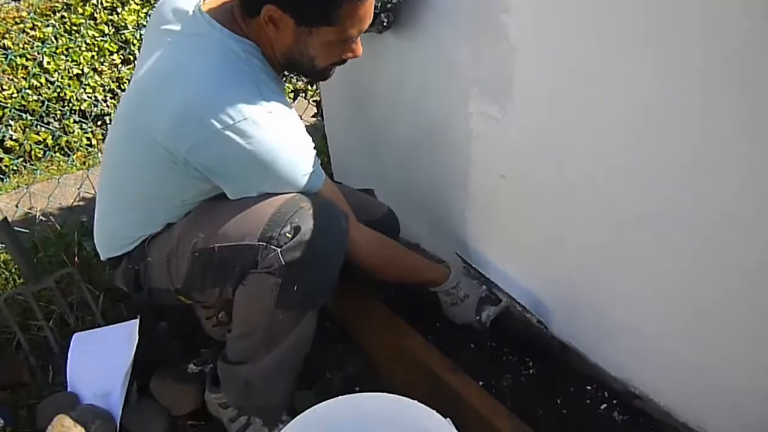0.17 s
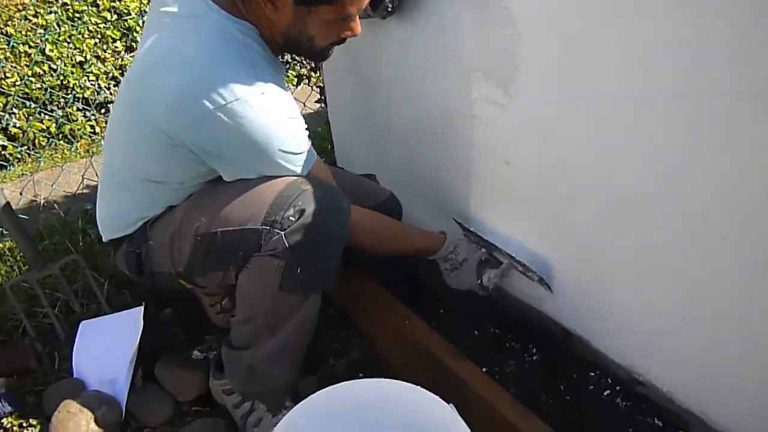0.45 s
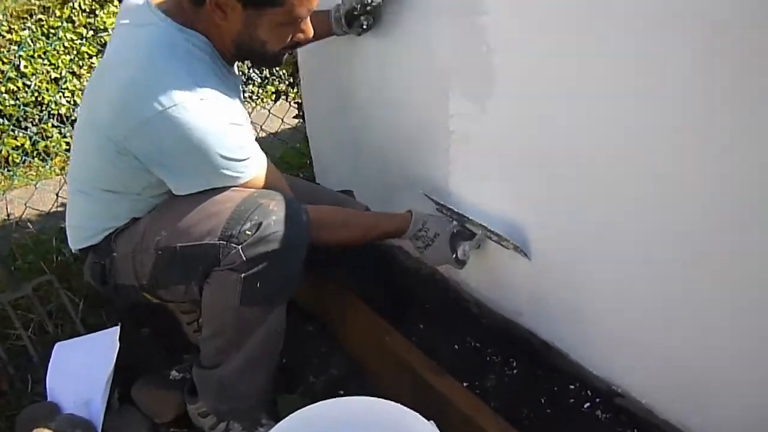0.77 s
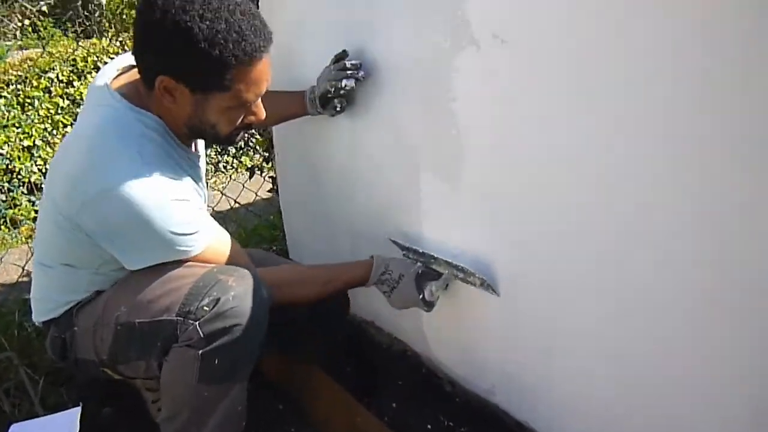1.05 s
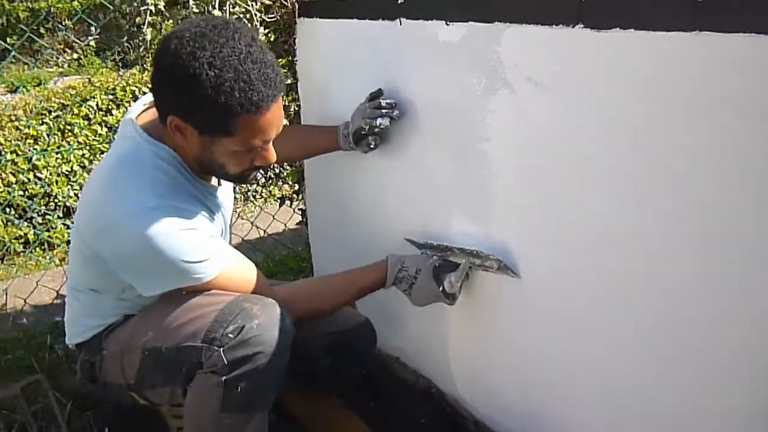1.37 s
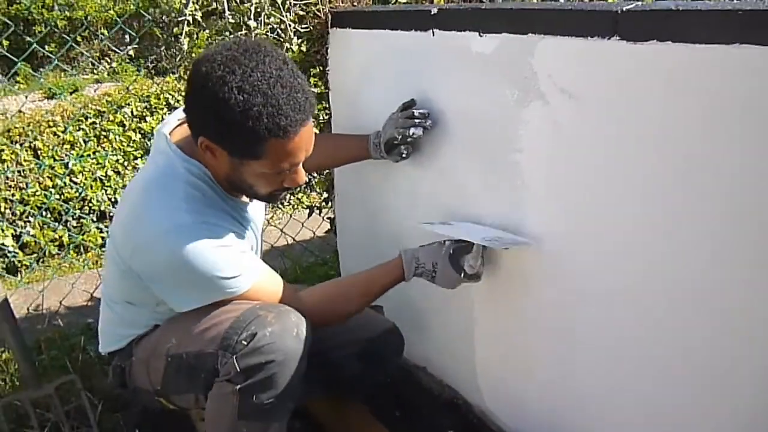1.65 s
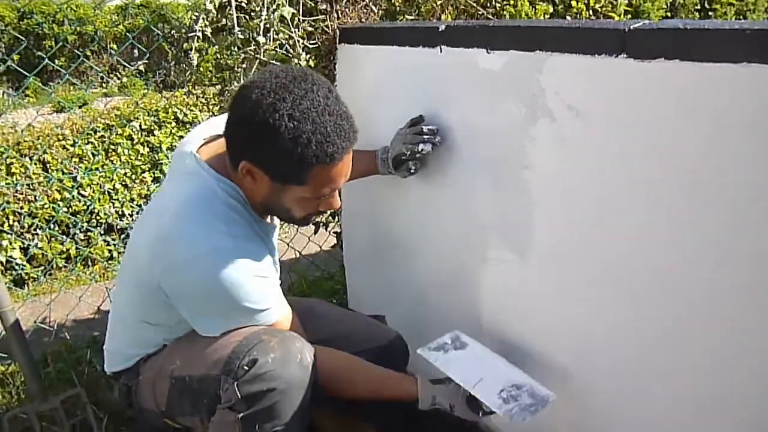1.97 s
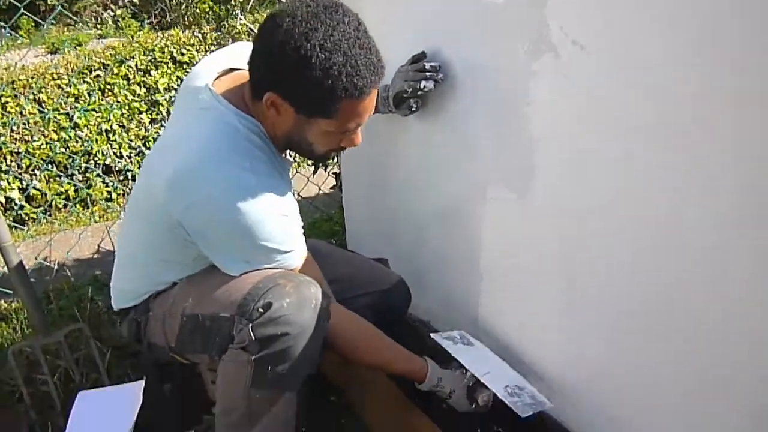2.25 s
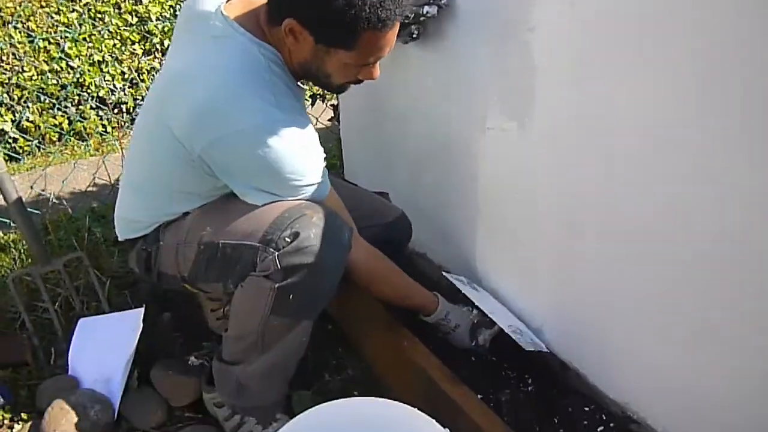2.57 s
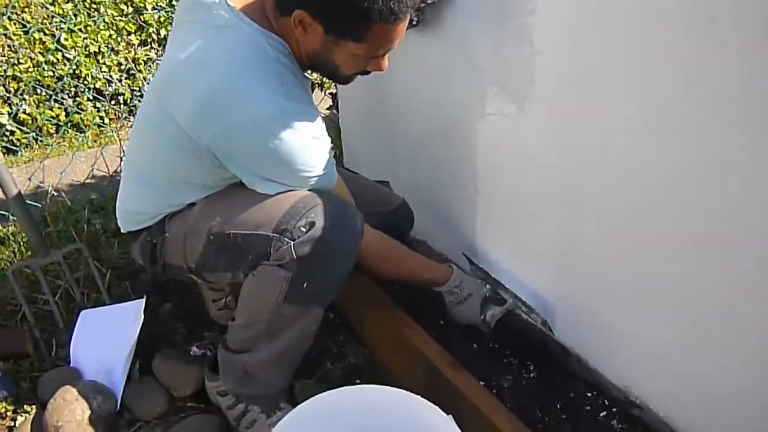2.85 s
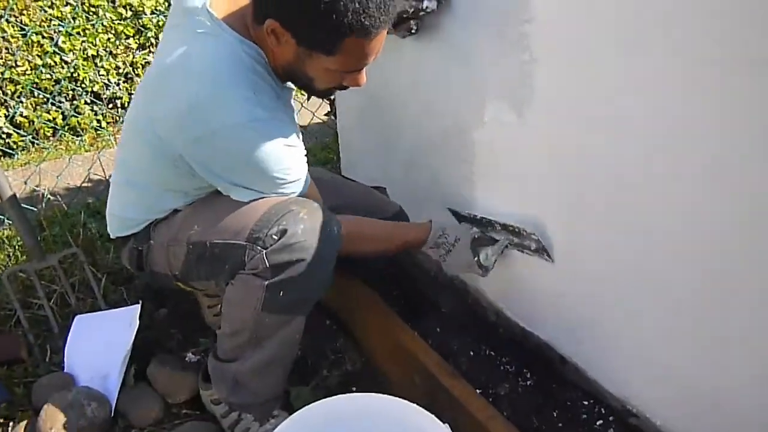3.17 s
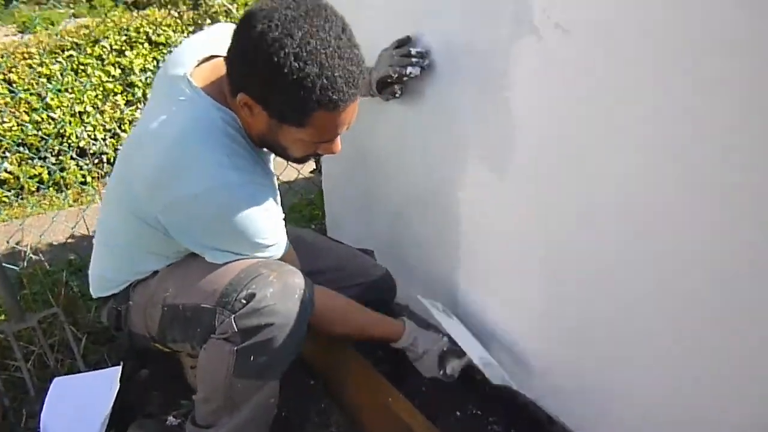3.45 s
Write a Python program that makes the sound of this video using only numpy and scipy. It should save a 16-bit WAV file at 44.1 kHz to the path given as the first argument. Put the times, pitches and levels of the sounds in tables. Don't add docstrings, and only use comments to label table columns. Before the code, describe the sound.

A steel trowel drags through wet sandy render in one long crackling stroke, pauses, then scrapes briefly again; close microphone outdoors, with wind thumps early, a quiet yard and faint distant knocks.

```python
import sys
import numpy as np
from scipy import signal
from scipy.fft import rfft, irfft
from scipy.io import wavfile
from scipy.ndimage import uniform_filter1d

SR = 44100
rng = np.random.default_rng(int(sys.argv[2]) if len(sys.argv) > 2 else 0)


def dump_mix(stems):
    frames = np.atleast_2d(stems).T
    limited = np.clip(frames, -1, 1)
    pcm = np.round(limited * 32767).astype(np.int16)
    wavfile.write(sys.argv[1], SR, pcm)


def volts_from_decibels(level):
    exponent = np.asarray(level, float) / 20
    return 10 ** exponent


N = 158760


def evened(x):
    return x / np.sqrt(np.mean(x ** 2) + 1e-20)


def read(points, hz):
    f, value = np.transpose(points)
    return np.interp(np.log(hz + 1), np.log(f + 1), value)


def colour(x, points):
    log_gain = read(points, abs(np.fft.fftfreq(4096, 1 / SR))) * np.log(10) / 20
    min_phase = np.exp(np.conj(signal.hilbert(log_gain)))
    taps = np.fft.ifft(min_phase).real[:2048]
    return signal.oaconvolve(x, taps)[:len(x)]


def resonate(x, hz, width_hz):
    turn = np.exp(2j * np.pi * np.cumsum(hz * np.ones(len(x))) / SR)
    r = np.exp(-np.pi * width_hz / SR)
    return 2 * (turn * signal.lfilter([1 - r], [1, -r], x / turn + 1e-18)).real


def drift(low_hz, top_hz):
    f = np.fft.rfftfreq(N, 1 / SR)
    shape = (f > low_hz) / np.sqrt(1 + f) / (1 + (f / top_hz) ** 4)
    return evened(irfft(rfft(rng.standard_normal(N)) * shape, N))


def clicks(per_s, spread_db):
    size_db = spread_db * np.minimum(rng.exponential(1, N), 3.5)
    size = volts_from_decibels(size_db) * rng.choice([-1., 1.], N)
    return evened(size * (rng.random(N) < per_s / SR))


# (time [s], level [dB])
GUSTS = [(0., -19.5), (.12, -27), (.6, -37), (1.1, -35), (1.7, -45), (2.0, -45), (2.7, -43.5), (2.95, -52),
         (3.2, -32), (3.33, -54), (3.45, -25.5), (3.6, -53)]
# (time [s], level [dB], length [s])
THUMPS = [(0.006, -17.5, 0.012), (0.065, -13.5, 0.011), (0.164, -16.5, 0.0051), (0.311, -14.5, 0.0095),
          (0.419, -19, 0.016), (0.542, -23, 0.041), (0.681, -28, 0.016), (0.893, -29, 0.025),
          (0.99, -26, 0.042), (1.381, -24.5, 0.011), (1.632, -33.5, 0.017), (1.814, -35, 0.022),
          (1.879, -34, 0.02), (1.976, -32, 0.012), (2.062, -38, 0.017), (2.278, -39.5, 0.01),
          (2.345, -37.5, 0.012), (2.491, -38.5, 0.012), (2.643, -43, 0.024), (3.205, -39, 0.022),
          (3.385, -26.5, 0.011), (3.409, -27, 0.01), (3.454, -34, 0.021), (3.485, -22.5, 0.005),
          (3.515, -28.5, 0.0062)]
# (frequency [Hz], level [dB per Hz])
WIND_SPECTRUM = [(25, -44), (55, -13.5), (95, -3), (135, -3.5), (190, -5.5), (270, -13.5), (400, -26.5),
                 (1500, -61)]


def wind():
    t = np.arange(N) / SR
    level = volts_from_decibels(np.interp(t, *np.transpose(GUSTS)) + 3.5 * drift(21, 45))
    for s, db, length_s in THUMPS:
        thump = volts_from_decibels(db) * np.exp(-((t - s) / max(length_s, .005)) ** 2)
        level = np.hypot(level, thump)
    air = rng.standard_normal(N)
    rumble = colour(air * level, WIND_SPECTRUM) / np.std(colour(air, WIND_SPECTRUM))
    flap = resonate(resonate(air, 210, 147), 210, 147)
    return rumble + volts_from_decibels(9.5) * level ** 2 * evened(flap)


# (frequency [Hz], level [dB per Hz])
YARD_SPECTRUM = [(300, -5), (620, -2), (1000, -1.5), (1500, -3), (2300, -9), (4000, -15.5), (8000, -25),
                 (15500, -34)]


def yard():
    wash = colour(rng.standard_normal(N), [(100, -30)] + YARD_SPECTRUM)
    return volts_from_decibels(-53 + .8 * drift(.5, 5)) * evened(wash)


# (start [s], length [s], start pitch [Hz], end pitch [Hz], level [dB])
WHINES = [
    (0., .19, 1385, 1440, -48),
    (0., .15, 2335, 2325, -57),
    (2.38, .8, 1235, 950, -54),
    (1.7, 1.9, 614, 613, -64),
]


def whines():
    t, out = np.arange(N) / SR, np.zeros(N)
    for s, length_s, from_hz, to_hz, db in WHINES:
        u = np.clip((t - s) / length_s, 0, 1)
        hz = from_hz + (to_hz - from_hz) * u + 4 * drift(2, 15)
        already_on = s <= .01
        fade = np.clip(np.minimum(u + already_on, 1 - u) * 4, 0, 1)
        out += volts_from_decibels(db + 1.8 * drift(4, 30)) * fade * np.sin(2 * np.pi * np.cumsum(hz) / SR)
    return out


# (time [s], pressure [dB], blade flex [0-1], edge bite [0-1])
STROKES = [
    [(.28, -29.5, 1, 0.7), (.34, -35, 0.9, 0.25), (.45, -28, 1., 0.87), (.75, -28, 0.86, 0.77),
     (.95, -28.5, 0.49, 0.8), (1.19, -28, 0.36, 0.62), (1.42, -27, 0.25, 1), (1.575, -29, 0.59, 0.8),
     (1.625, -60, 0.53, 0.7)],
    [(2.868, -60, 0.67, 0.5), (2.89, -41.5, 0.37, 0.6), (2.96, -34, 0.61, 0.33), (3.04, -28, 0.41, 0.18),
     (3.135, -28, 0.52, 0.1), (3.18, -24, 0.7, 0.3), (3.255, -26.5, 0.78, 0.77), (3.28, -48, 0.4, 1),
     (3.32, -60, 0.5, 0.8)],
]


def stroke_motion():
    t = np.arange(N) / SR
    rows = np.array([row for stroke in STROKES for row in stroke])
    flex, bite = (np.interp(t, rows[:, 0], np.clip(rows[:, k], 0, 1.5)) - .5 for k in (2, 3))
    press = np.zeros(N)
    for stroke in STROKES:
        s, db = np.transpose(stroke)[:2]
        press += volts_from_decibels(np.interp(t, s, db, left=-120, right=-120))
    return press * volts_from_decibels(1.5 * drift(23, 230)), flex, bite


# (time [s], peak [dB], length [s], blade ring over grit [dB])
JUDDERS = [(0.053, -36, 0.012, 15), (0.155, -29, 0.011, -3.5), (0.19, -31.5, 0.024, 11),
           (0.221, -24.5, 0.043, 0.5), (0.253, -15.5, 0.0054, 10), (0.284, -12.5, 0.014, 6.5),
           (0.315, -13.5, 0.02, 3), (0.355, -14, 0.0091, 13), (0.369, -14.5, 0.0096, -7.5),
           (0.417, -14, 0.0047, 2), (0.962, -14, 0.012, 0), (1.225, -20, 0.012, 14),
           (1.554, -20.5, 0.019, -10), (1.595, -30, 0.0095, 11), (1.623, -39, 0.023, -4),
           (2.792, -32, 0.018, 11.5), (2.87, -34.5, 0.01, 10), (2.915, -26, 0.004, 4),
           (2.965, -24, 0.006, 9), (2.973, -14.5, 0.0091, 0.5), (3.042, -21, 0.012, -8),
           (3.113, -14, 0.017, -3)]


def judder(grit, ring):
    t = np.arange(N) / SR
    for s, db, length_s, ring_db in JUDDERS:
        u = np.clip((t - s) / max(length_s, .003), 0, 30)
        burst = volts_from_decibels(db) * np.sqrt(u) * np.exp(-2 * u ** 0.95)
        grit = np.hypot(grit, burst * volts_from_decibels(-ring_db / 2))
        ring = np.hypot(ring, burst * volts_from_decibels(ring_db / 2))
    return grit, ring


def sparks(count=24):
    out, t = np.zeros(N), np.arange(130) / SR
    per_s, spread_db = 1500, 3.2
    for hz in np.geomspace(2500, 14000, count):
        ping = np.sin(2 * np.pi * hz * t) * volts_from_decibels(-60 * t / .003) * np.minimum(t / .0002, 1)
        out += signal.oaconvolve(clicks(per_s / count, spread_db), ping)[:N]
    return out


def slurry():
    flow_share = 0.8
    fine = flow_share * rng.standard_normal(N) + (1 - flow_share) * clicks(per_s=6300, spread_db=3.5)
    pings = evened(colour(sparks(), [(2000, -7), (14000, 9.5)]))
    return evened(fine) + volts_from_decibels(-9) * pings


def patchy(x):
    z = signal.stft(x, nperseg=256)[2]
    field = uniform_filter1d(rng.standard_normal(z.shape), size=5, axis=0)
    field = uniform_filter1d(field, size=9, axis=1)
    return signal.istft(z * volts_from_decibels(1.6 * evened(field)), nperseg=256)[1][:N]


# (frequency [Hz], level [dB per Hz])
GRIT_SPECTRUM = [(150, -18.5), (500, -2), (2000, -1.5), (5000, -7.5), (7400, -13.5), (10500, -14),
                 (13000, -11.5), (15500, -20.5)]


def direct_grit(fine, grit):
    flicker = volts_from_decibels(1.62 * drift(140, 970))
    scrape = colour(fine * grit * flicker, GRIT_SPECTRUM)
    return patchy(scrape) / np.std(colour(fine, GRIT_SPECTRUM))


# (frequency [Hz], width [Hz], level [dB], gain by flex [dB], gain by bite [dB])
BLADE_MODES = [(442, 111, -7, 14.5, 1), (629.6, 48, -3, 13, -1.5), (725, 150, -4.5, 0.5, 7.5),
               (1011, 96, -2.5, 5.5, 8), (1198, 162, -4.5, 3.5, 7), (1607, 180, -5, -7.5, 4.5),
               (1930, 275, -4.5, -12.5, 5.5), (2520, 280, -7.5, -33, -10.5), (3340, 740, -7, -5, -12),
               (4820, 930, -12.5, -6.5, -14)]


def blade_ring(drive, flex, bite):
    out = np.zeros(N)
    for k, (hz, width_hz, db, flex_db, bite_db) in enumerate(BLADE_MODES):
        gain = volts_from_decibels(db + flex_db * flex + bite_db * bite) / np.sqrt(width_hz / SR)
        mode_hz = hz * (1 + 0.024 * drift(.4, 4.9))
        out += (-1) ** k * gain * resonate(drive, mode_hz, width_hz)
    return out


def trowel():
    press, flex, bite = stroke_motion()
    grit, ring = judder(press, press * volts_from_decibels(.8 * drift(30, 200)))
    fine = slurry()
    coarse = clicks(per_s=1800, spread_db=2)
    drive = ring * evened(coarse + 0.23 * fine)
    out = volts_from_decibels(0.5) * direct_grit(fine, grit) + volts_from_decibels(3.5 - 9) * blade_ring(drive, flex, bite)
    hollow_hz = 700 + 300 * flex
    return out - .8 * resonate(out, hollow_hz, 150)


# (time [s], peak [dB], pitch [Hz])
SNAPS = [(0.2545, -16, 560), (0.3741, -7.5, 566), (0.3919, -3, 1090), (0.5086, -4.5, 1030),
         (0.5399, -6, 1100), (0.6491, -8, 1080), (0.6775, -10, 1040), (0.7047, -2, 1230),
         (0.7267, -12, 1290), (0.7402, -15, 1100), (0.8204, -4, 1180), (0.8455, -11, 1100),
         (0.8946, -15, 1870), (0.9716, -11, 1150), (1.0085, -9, 1030), (1.0183, -5.5, 1810),
         (1.0298, -6, 1660), (1.074, -8.5, 2350), (1.082, -15, 2520), (1.1003, -7, 1100),
         (1.1183, -14, 2420), (1.183, -5.5, 1780), (1.2079, -10, 1960), (1.2329, -4, 2330),
         (1.2398, -7, 1990), (1.2684, -10, 1250), (1.28, -8, 1280), (1.321, -10, 1120), (1.363, -4.5, 1930),
         (1.3915, -5, 1220), (1.4462, -6.5, 1110), (1.4882, -4, 1070), (2.9155, -15, 3450),
         (2.9427, -22, 646), (2.9749, -9, 1370), (3.019, -13, 1190), (3.043, -10, 2630),
         (3.0518, -10, 1420), (3.0668, -9, 2630), (3.087, -9, 1390), (3.1165, -3.5, 3250),
         (3.1249, -6, 1850), (3.1474, -18, 530), (3.1752, -25, 610), (3.1857, -22, 560), (3.2467, -9, 1110)]


def snaps():
    t, out = np.arange(700) / SR, np.zeros(N)
    for (s, db, hz), sign in zip(SNAPS, rng.choice([-1., 1.], len(SNAPS))):
        decay = volts_from_decibels(-60 * t * hz / 9)
        ring = decay * np.sin(2 * np.pi * hz * t) * np.minimum(t * hz * 4, 1)
        tick = volts_from_decibels(-12 - 60 * t / 0.003) * rng.standard_normal(len(t))
        start = round((s - .2 / hz) * SR)
        out[start:][:len(t)] += sign * volts_from_decibels(db - 2) * (ring / abs(ring).max() + tick)
    return out


# (time [s], level [dB], length [s], pitch [Hz])
SINGS = [(.256, -16.5, .005, 1052), (.257, -16.5, 0.0085, 574.7), (0.447, -16, 0.0052, 594),
         (0.334, -25, .008, 1077), (.475, -22.5, .008, 614), (0.505, -23, 0.011, 1117),
         (0.618, -19.5, 0.016, 1146), (0.685, -19.5, .009, 1070), (0.707, -19, .006, 1216),
         (.745, -25, 0.011, 1088), (.791, -18, 0.0062, 1070), (.846, -20, 0.0038, 1115),
         (0.923, -18.5, 0.0078, 1015), (0.983, -22, 0.0091, 993), (1.393, -22.5, 0.0057, 1173),
         (1.45, -25, 0.008, 1107), (1.481, -21.5, 0.015, 1003), (1.542, -22, 0.0089, 1063),
         (1.569, -22.5, 0.013, 1037), (1.602, -26, 0.0058, 640), (3.167, -26.5, 0.014, 516.6),
         (3.19, -26.5, .012, 1144), (3.215, -22, 0.015, 1074), (3.24, -21, 0.008, 1114),
         (3.249, -29.5, 0.013, 520)]


def sings():
    half = 1500
    t, out, waver = np.arange(-half, half) / SR, np.zeros(N), drift(20, 150)
    for s, db, length_s, hz in SINGS:
        span = slice(round(s * SR) - half, round(s * SR) + half)
        swell = volts_from_decibels(db + 2) * np.exp(-(t / np.clip(length_s, .003, .016)) ** 2)
        phase = 2 * np.pi * np.cumsum(hz * (1 + 0.028 * waver[span])) / SR
        out[span] += swell * np.sin(phase)
    return out


def echo(x):
    t, t60_s = np.arange(SR // 3) / SR, .22
    scatter = rng.standard_normal(len(t)) * volts_from_decibels(-60 * t / t60_s) * (t > .006)
    taps = colour(scatter, [(1200, 2), (9000, -8)])
    return volts_from_decibels(-21) * signal.oaconvolve(x, taps / np.linalg.norm(taps))[:N]


# (time [s], peak [dB])
KNOCKS = [
    (1.745, -41.5),
    (2.028, -40.5),
    (3.527, -41),
]
# (frequency [Hz], level [dB], t60 [s])
KNOCK_MODES = [(852, -4.5, .045), (1015, -3.5, 0.032), (1250, -4, 0.027), (1485, -3, 0.031),
               (1730, -8, 0.026), (2065, -4, 0.021), (3310, -11, 0.012), (4260, -18, .012),
               (6500, -16, 0.013)]


def knocks():
    t, out = np.arange(SR // 5) / SR, np.zeros(N)
    for s, db in KNOCKS:
        ring = np.zeros(len(t))
        for hz, mode_db, t60_s in KNOCK_MODES:
            tone = np.sin(2 * np.pi * hz * rng.uniform(0.95, 1.03) * t)
            ring += volts_from_decibels(mode_db - 60 * t / t60_s) * np.minimum(t / 0.00086, 1) * tone
        echoes = rng.standard_normal(len(t)) * (rng.random(len(t)) < .05)
        echoes *= volts_from_decibels(-60 * t / .3) * np.minimum(t / .005, 1)
        echoes *= 1 + .5 * (t < .024)
        hit = signal.fftconvolve(ring, echoes)[:len(t)]
        part = out[round((s - .007) * SR):][:len(t)]
        part += volts_from_decibels(db + 11) * (hit / abs(hit).max())[:len(part)]
    return out


# (frequency [Hz], level re mid [dB])
SIDE_SPECTRUM = [(30, -22), (130, -36), (1000, -30), (2500, -21), (15000, -16.5)]


def scene():
    near = trowel() + snaps() + sings()
    mid = wind() + yard() + whines() + near + echo(near) + knocks()
    side = colour(mid, SIDE_SPECTRUM) * drift(8, 40)
    return np.array([mid + side, mid - side])


def low_pass(x):
    return signal.sosfilt(signal.butter(12, 15790, fs=SR, output="sos"), x)


def record(dry):
    limited = 1.1 * np.tanh(dry / 1.1)
    lowpass = signal.firwin(255, 15480, fs=SR)
    mix = signal.oaconvolve(limited, lowpass[None], "same")
    return low_pass(mix)


dry = scene()
out = record(dry)
dump_mix(out)
```